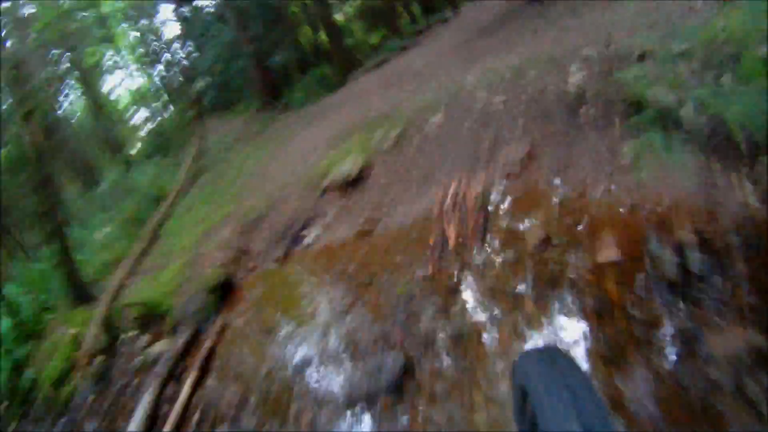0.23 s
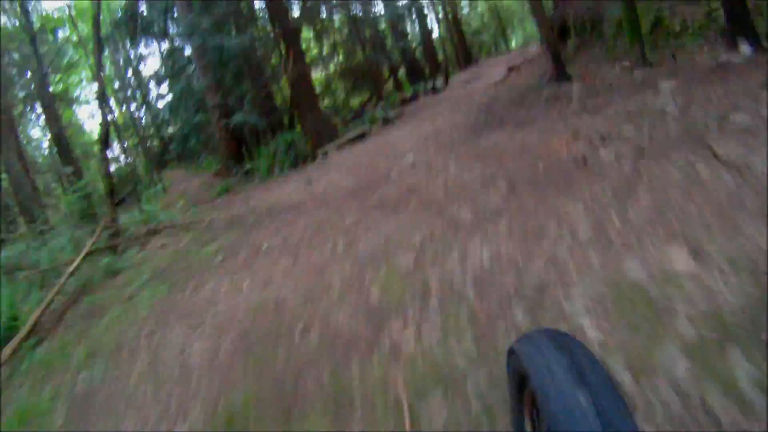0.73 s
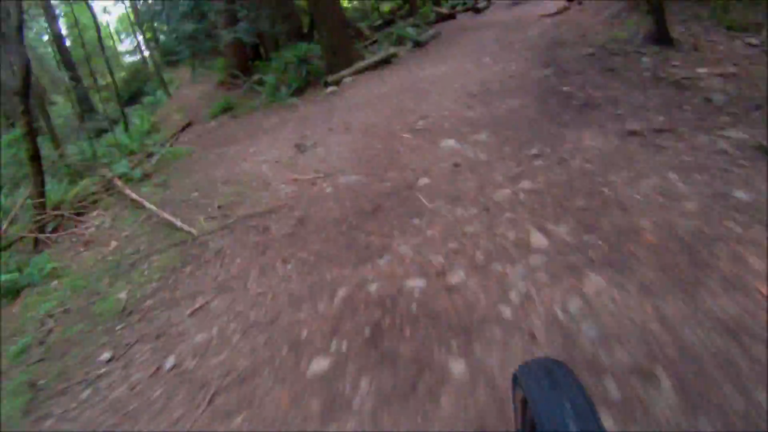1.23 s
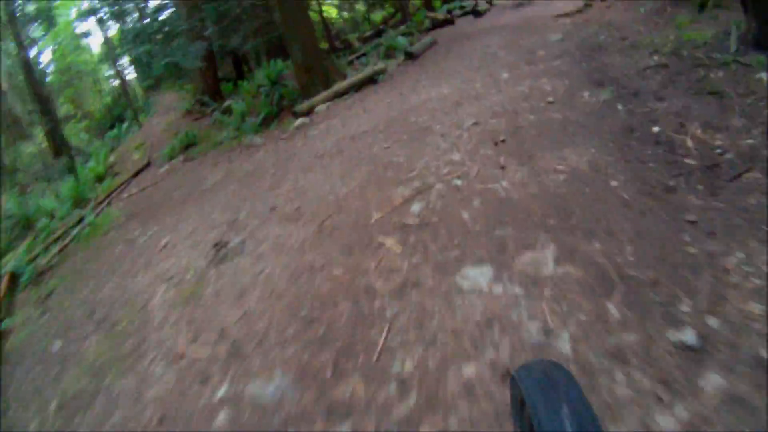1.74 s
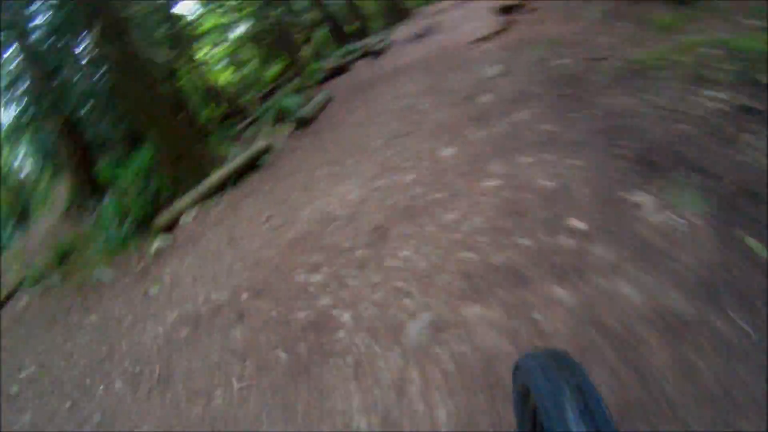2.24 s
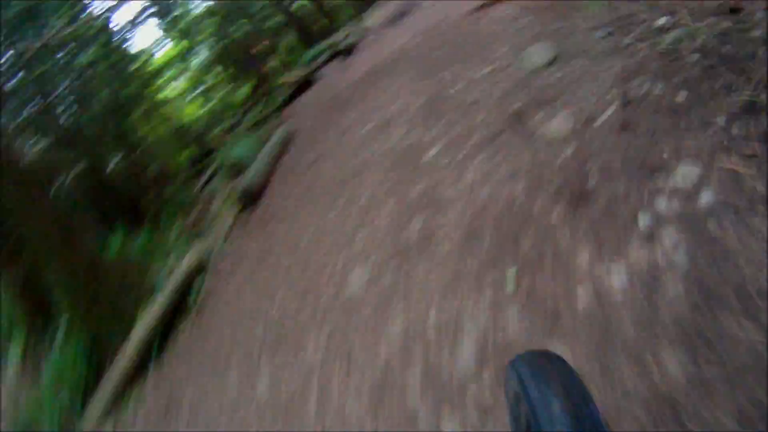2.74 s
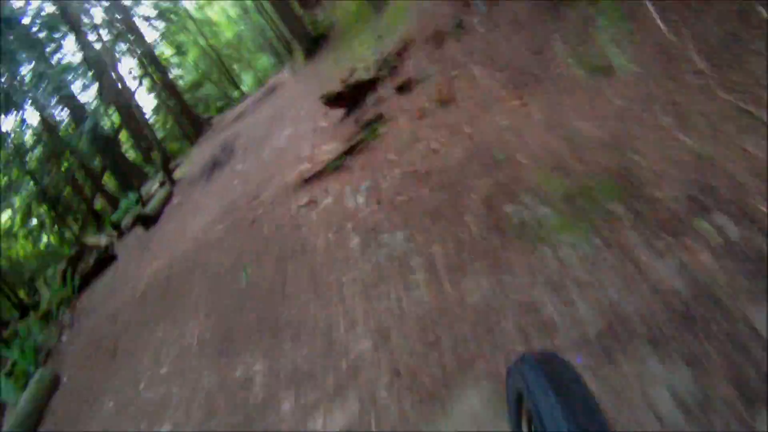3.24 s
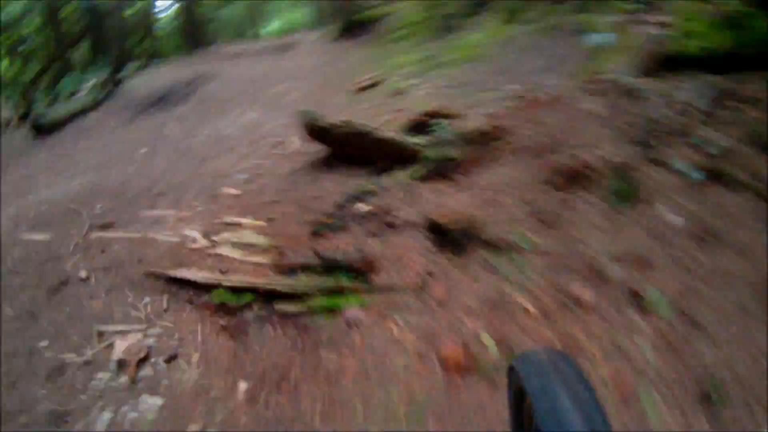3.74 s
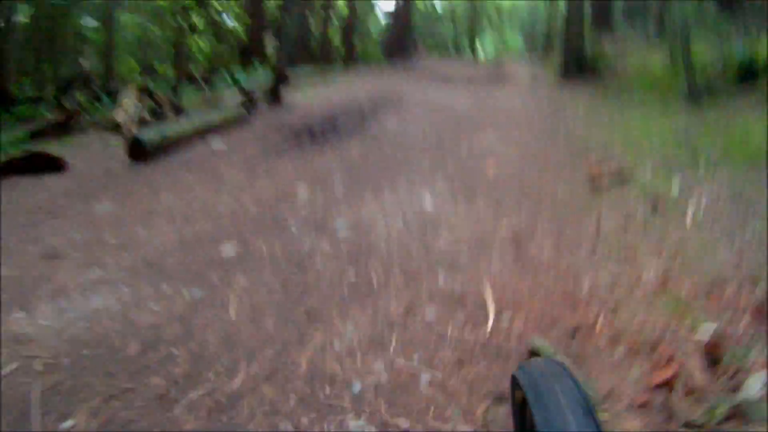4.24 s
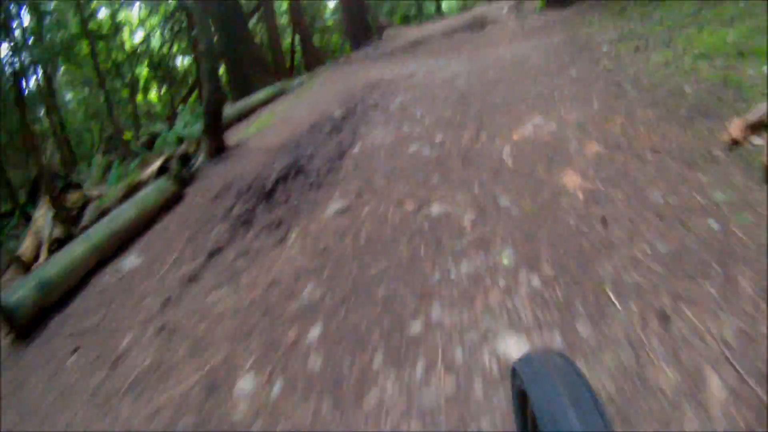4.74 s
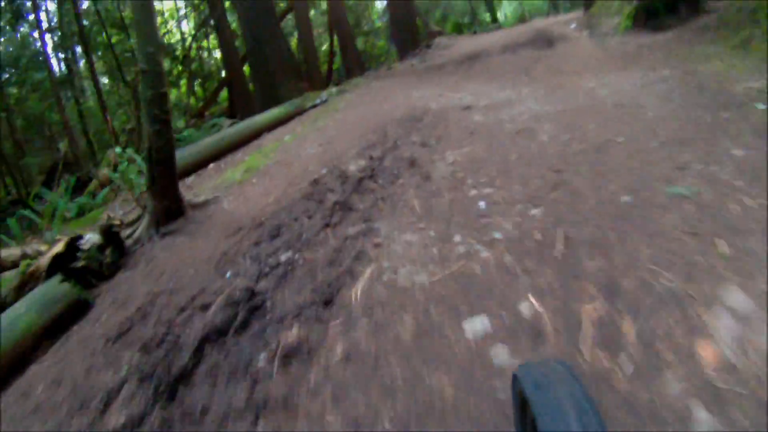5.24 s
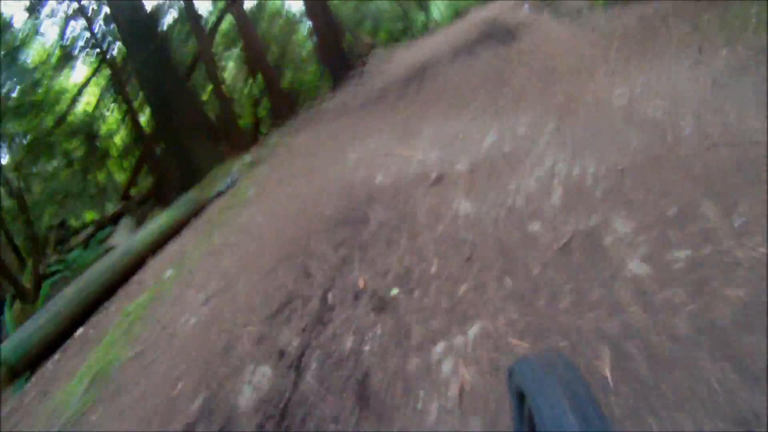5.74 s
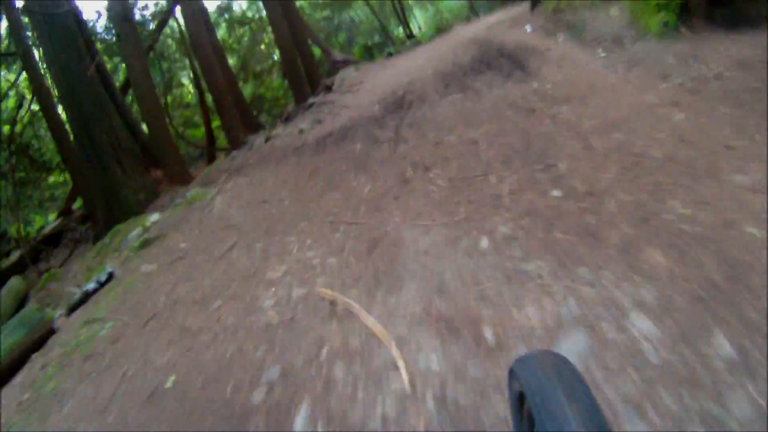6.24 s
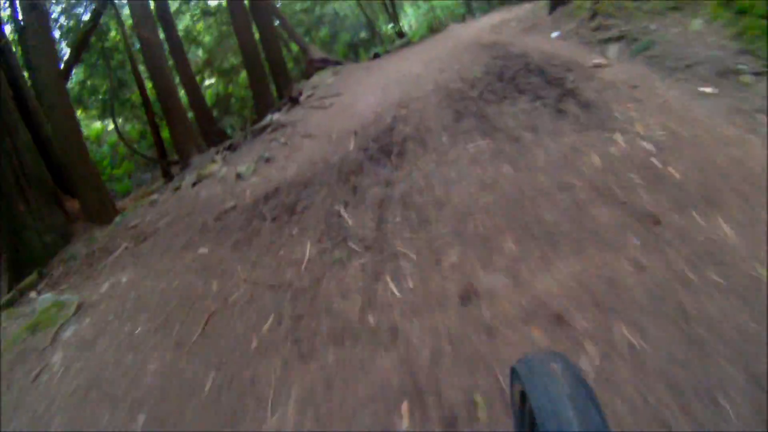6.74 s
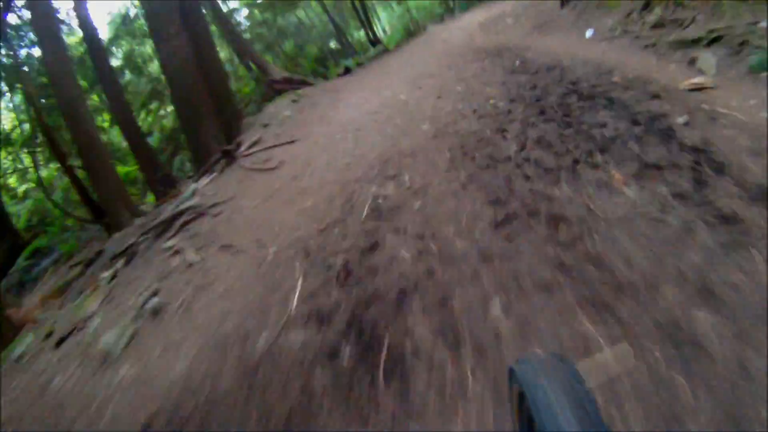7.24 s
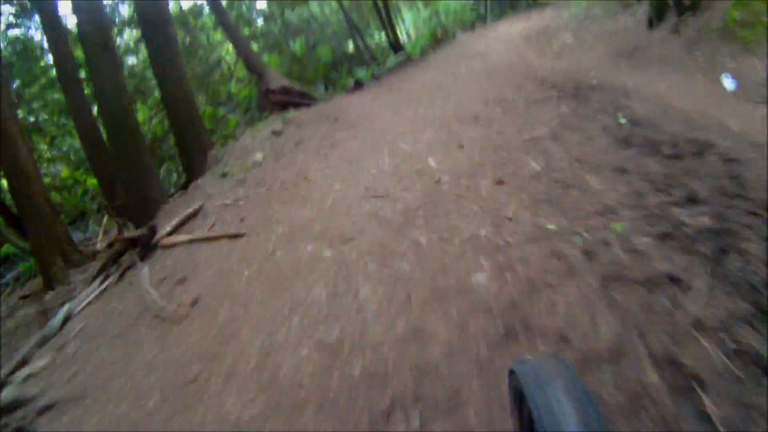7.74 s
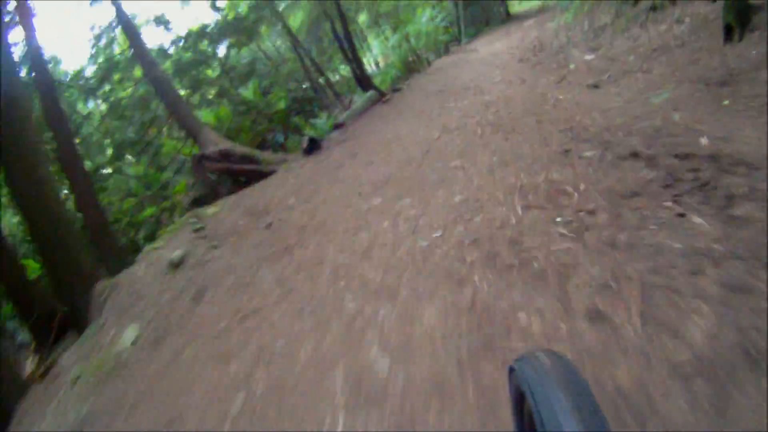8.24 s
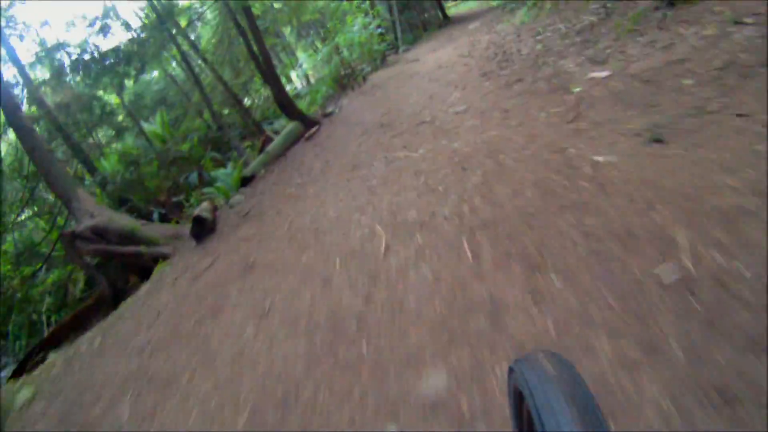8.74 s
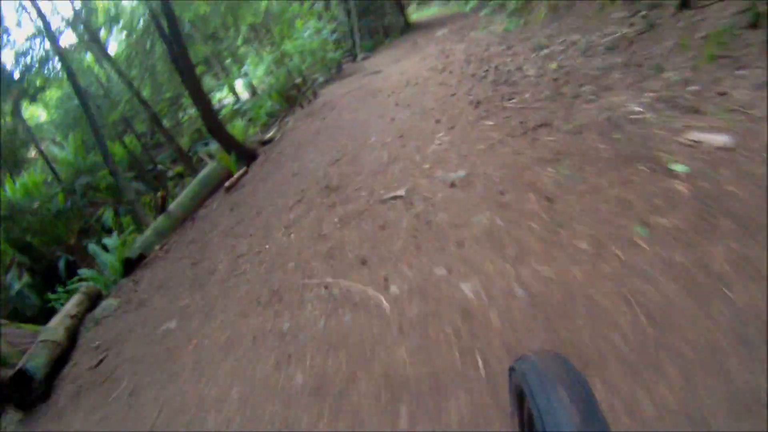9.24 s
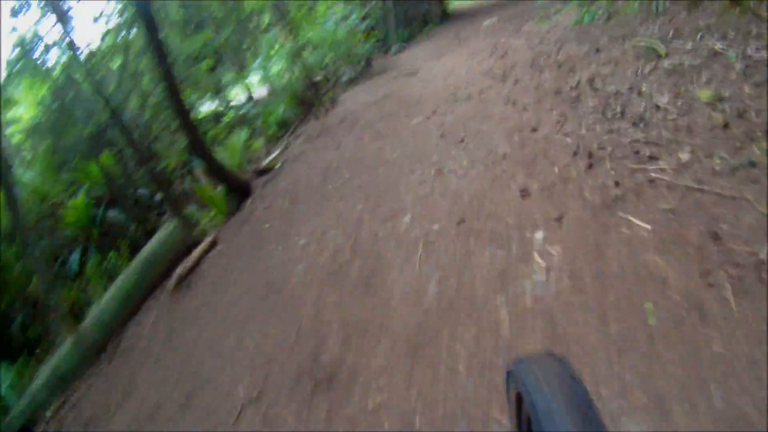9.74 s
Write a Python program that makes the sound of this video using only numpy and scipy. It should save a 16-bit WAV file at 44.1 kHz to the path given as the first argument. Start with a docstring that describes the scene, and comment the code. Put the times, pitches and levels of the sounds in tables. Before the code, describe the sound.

On a forest trail, a bicycle-mounted microphone in a boxy housing picks up water spraying off the tyre, then rough dirt grinding beneath it. Dense, hollow knocks and rattles dominate the first half, some distorting, with short brake-like squeaks and flung grit ticking on the frame. Toward the end the ground grows smoother, with quieter sandy rolling, occasional stone pops and a couple of last knocks.

```python
"""Water splashes and hard knocks ring out as a mountain bike runs fast down a forest trail, then dirt crunches.
Tyres: random pops, sand noise and grit through a boxy camera housing, over frame rumble and mount sway. Knocks
of chain and frame: short decaying sines with rattle, crack and thud; the hardest overload the input. Puddle:
dense filtered clicks. Also popping stones and a few knocks sounded alike, grit ticks, brake-like rubs, a faint
whine and hiss."""
import sys
import numpy as np
from scipy import signal
from scipy.fft import rfft, irfft
from scipy.io import wavfile
from scipy.ndimage import uniform_filter1d

SR = 44100
rng = np.random.default_rng(int(sys.argv[2]) if len(sys.argv) > 2 else 0)


def bounce(signal):
    """Save signal as a 16-bit WAV file at the path given by the first command-line argument."""
    frames = np.transpose(np.atleast_2d(signal))
    limited = np.clip(frames, -1, 1)
    pcm = np.round(limited * 32767).astype(np.int16)
    wavfile.write(sys.argv[1], SR, pcm)


N = 440118
TIME = np.arange(N) / SR

# Knocks of chain and frame. Each row: start [s], nominal peak [dB], ring pitch [Hz],
# nominal contact time [s], nominal crack level relative to the ring [dB].
KNOCK_EVENTS = [(0.0353, -3.5, 1880, 0.00089, -17), (0.1576, -7.5, 1624, 0.0032, -24),
                (0.2492, 1, 1370, 0.00009, -47), (0.3002, -5, 1550, 0.0019, -21),
                (0.5304, -5, 1480, 0.0018, -26), (0.7934, -5.5, 1920, 0.0022, -23),
                (0.8614, -4.5, 1510, 0.0039, -19), (0.8745, 0.5, 1900, 0.000048, -13.5),
                (0.9057, -1.5, 1700, 0.00064, -9.5), (0.9816, -5.5, 1840, 0.0017, -9.5),
                (1.018, -3, 1820, 0.00099, -42), (1.08, -8.5, 1570, 0.0017, -17),
                (1.2412, -14, 1480, 0.0027, -46), (1.406, -17.5, 1935, 0.0055, -14.5),
                (1.5274, -3, 1620, 0.00094, -11), (1.55, -9, 1580, 0.0062, -12),
                (1.5669, 0, 1330, 0.0021, -11), (1.595, -2.5, 1900, 0.0011, -9.5),
                (1.611, -1, 2060, 0.00044, -20), (1.6321, -3.5, 1930, 0.00056, -6.5),
                (1.6469, -3.5, 1445, 0.0035, -22.5), (1.795, -5.5, 1720, 0.0017, -13),
                (1.9199, -14.5, 1930, 0.0045, -28), (1.9721, 0.5, 1604, 0.00097, -37),
                (2.0616, -17, 1450, 0.00024, 1.5), (2.1337, -3, 1830, 0.00087, -7),
                (2.2514, -8.5, 1650, 0.0012, -16), (2.469, -13.5, 1720, 0.0024, -38),
                (2.5666, -4.5, 1580, 0.0029, -41), (2.6785, -5, 1620, 0.0009, -15.5),
                (2.797, -3.5, 1640, 0.0016, -20.5), (2.954, -12.5, 1680, 0.0015, -37),
                (3.124, -1.5, 1650, 0.0016, -31), (3.1812, -14.5, 1640, 0.0024, -48),
                (3.3829, -5, 1590, 0.0008, -38), (3.5229, -2.5, 1620, 0.00049, -36),
                (3.6098, -2, 1560, 0.0011, -29), (3.867, -3, 1386, 0.0042, -19.5),
                (3.9094, -6.5, 1700, 0.0054, -23), (3.944, -8, 1440, 0.0032, -47),
                (3.958, -1.5, 1890, 0.0012, -22.5), (4.1099, -4, 1570, 0.0019, -79),
                (4.1708, -4, 2080, 0.00052, -14), (4.4887, -8, 1550, 0.0018, -33),
                (4.52, -12, 1780, 0.001, -21), (4.6451, -2, 1300, 0.001, -14),
                (4.7323, -11, 1960, 0.003, -20.5), (4.7842, -0.5, 1480, 0.0041, -25.5),
                (4.833, -8, 1870, 0.0017, -18.5), (4.96, -9, 1630, 0.0018, -22),
                (4.976, -7.5, 2040, 0.0041, -32), (5.1093, -2.5, 1520, 0.00045, -27.5),
                (5.2234, -6.5, 1720, 0.0015, -49), (5.2939, -4, 1440, 0.0036, -17.5),
                (5.58, -13.5, 1950, 0.00081, -21), (5.707, -7, 1490, 0.000061, -25),
                (5.8827, -7, 1510, 0.001, -50), (6.337, -13, 1490, 0.0021, -42),
                (6.57, -10, 1630, 0.00013, -19), (6.735, -8.5, 1570, 0.00093, -46),
                (6.7872, -7.5, 1510, 0.0013, -56), (6.8951, -5.5, 1450, 0.00044, -14),
                (6.9573, -10.5, 1640, 0.00021, -19.5), (7.327, -12, 1500, 0.00043, -20.5),
                (7.357, -13.5, 1470.0, 0.0012, -49), (7.649, -9, 1550, 0.0017, -22),
                (7.7246, -5.5, 1620, 0.00026, -9.5), (7.817, -7.5, 1270, 0.00059, -21),
                (8.0657, -8.5, 1470, 0.00086, -49), (8.1082, -9.5, 1530, 0.0033, -44),
                (9.402, -10.5, 1350, 0.00055, -20.5), (9.953, -7.5, 1640, 0.0017, -24),
                (9.9707, -6.5, 1510, 0.00039, -17)]
# Colour of the frame's rumble. Each row: frequency [Hz], gain [dB].
FRAME_COLOUR = [(20, -28), (45, -17), (64, -10), (115, -12), (165, 1), (220, 5.5), (280, -1.5), (350, -6),
                (440, -18), (700, -15), (1500, -71.5)]
# What the housing passes on from a small impact. Each row: frequency [Hz], gain [dB].
HOUSING_COLOUR = [(150, -21), (560, -17.5), (740, -2), (1120, -5), (1420, 2.5), (1630, 5), (1800, -5.5),
                  (2020, -1), (2250, -8), (2550, -9.5), (2950, -28), (3400, -34.5), (5000, -36.5),
                  (14000, -72)]
# Colour of flying grit and water. Each row: frequency [Hz], gain [dB].
SPRAY_COLOUR = [(1200, -2.5), (2800, -4), (4300, 1.5), (5500, -2.5), (7000, -11), (10500, -29.5),
                (15500, -39)]

# Unweighted, the frame calms quickly; the tread leaves the gravel gradually. dB per unit of hop height.
LIFT_RUMBLE_DB, LIFT_RUMBLE_S = -9, 0.036
LIFT_CRUNCH_DB, LIFT_CRUNCH_S = -23.5, 0.26


def gain_of(db):
    """Amplitude factor of a level in dB."""
    return 10 ** (np.asarray(db) / 20)


def evened(x):
    """Scale to unit RMS."""
    return x / np.sqrt(np.mean(x ** 2) + 1e-20)


def local_power(x, size):
    """Mean power over about size samples."""
    smoothed = uniform_filter1d(uniform_filter1d(x ** 2, size), size // 2)
    return abs(smoothed) + 1e-12


def steadied(x, size):
    """Near-unit power over every stretch of about size samples; finer grain stays."""
    return x / np.sqrt(local_power(x, size))


def add(mix, s, sound):
    """Add a sound to the mix in place, starting at s seconds."""
    part = mix[max(round(s * SR), 0):][:len(sound)]
    part += sound[:len(part)]


def coloured(x, points, size=8192):
    """Causal minimum-phase filter with the given spectrum: clicks ring after they land."""
    hz, db = np.transpose(points)
    bin_hz = abs(np.fft.fftfreq(size, 1 / SR))
    log_gain = np.log(gain_of(np.interp(np.log(bin_hz + 1), np.log(hz), db)))
    spectrum = np.exp(np.conj(signal.hilbert(log_gain)))
    response = np.fft.ifft(spectrum).real[:size // 2]
    return signal.oaconvolve(x, response)[:len(x)]


def band(x, hz, width_hz):
    """A resonance of gain one at its centre."""
    return signal.lfilter(*signal.iirpeak(hz, hz / width_hz, SR), x)


def wander(hz):
    """Slow random motion of unit RMS: noise under a Gaussian low-pass."""
    low_pass = np.exp(-(np.fft.rfftfreq(N, 1 / SR) / hz) ** 2)
    return evened(irfft(rfft(rng.standard_normal(N)) * low_pass, N))


def impacts(per_s, spread_db):
    """Random clicks of either sign, many small and a few large."""
    size = gain_of(spread_db * np.minimum(rng.exponential(1, N), 5))
    return size * rng.choice([-1, 1], N) * (rng.random(N) < per_s / SR)


def hiss(db=-73.5):
    """Steady white noise floor."""
    return gain_of(db) * rng.standard_normal(N)


def camera_whine(hz=7868, db=-71, frames_per_s=30):
    """A faint electronic tone that switches on once per picture frame."""
    switched = np.sin(2 * np.pi * frames_per_s * TIME) > -.25
    return gain_of(db) * switched * np.sin(2 * np.pi * hz * TIME)


def rubs():
    """Brief friction, probably a brake pad on its disc: a fuzzy whistle that sinks and judders."""
    # Each row: start [s], length [s], mid pitch [Hz], RMS level before the fades [dB].
    rub_events = [(1.061, 0.1, 4160, -41.5), (1.677, 0.073, 4200, -43.5), (2.291, 0.078, 4500, -45.5),
                  (2.563, 0.083, 4170, -42), (4.25, 0.13, 4240, -46)]
    sag_hz_per_s, fuzz_cutoff_hz, judder_hz = 2200, 210, 26
    out = np.zeros(N)
    for s, length_s, hz, db in rub_events:
        t = np.arange(round(length_s * SR)) / SR
        turns = np.cumsum(hz - sag_hz_per_s * (t - length_s / 2)) / SR
        low_pass = signal.butter(2, fuzz_cutoff_hz, fs=SR)
        fuzz = signal.lfilter(*low_pass, rng.standard_normal((2, SR)))[:, :len(t)]
        whistle = fuzz[0] * np.cos(2 * np.pi * turns) + fuzz[1] * np.sin(2 * np.pi * turns)
        grip = 1 + 0.59 * np.sin(2 * np.pi * (judder_hz * t + rng.random()))  # the pad catches and slips
        add(out, s, gain_of(db) * signal.windows.tukey(len(t), .5) * evened(grip * whistle))
    return out


def ticks():
    """Flung grit strikes the frame at various spots: noise bursts, each with its own bright ring."""
    # Each row: start [s], peak [dB].
    tick_events = [(1.328, -28), (2.705, -29), (3.625, -21), (3.651, -20), (3.738, -22), (4.702, -18),
                   (4.899, -21), (5.191, -25), (5.781, -22.5), (5.929, -24.5), (6.029, -27.5),
                   (6.121, -31.5), (7.163, -26.5), (7.766, -31), (8.031, -22), (8.208, -30.5),
                   (8.258, -29.5), (8.361, -30), (8.638, -30.5), (8.791, -29.5)]
    base_hz, decay_s = 4930, 0.00089
    out, t = np.zeros(N), np.arange(2048) / SR
    for s, db in tick_events:
        strike = rng.standard_normal(len(t)) * np.exp(-t / decay_s)
        bright = coloured(strike, SPRAY_COLOUR)
        ring = band(bright, base_hz * 2 ** rng.uniform(-0.75, 0.6), 500)
        tick = evened(bright) + .6 * evened(ring)
        add(out, s, gain_of(db) * tick / abs(tick).max())
    return out


def pops():
    """Larger stones pop from under the tread, and a few further knocks sound the same way: a swelling, dying
    ring in the housing plus a scrape of sand."""
    # Each row: start [s], peak [dB]. The rows at 3.045, 3.63, 3.889 and 8.078 s are further knocks.
    pop_events = [(1.116, -9), (3.045, -9), (3.63, -13), (3.889, -17), (4.865, -10), (4.912, -15.5),
                  (5.074, -9), (5.145, -6.5), (5.25, -11.5), (5.646, -13), (5.927, -12), (5.992, -11.5),
                  (6.253, -21), (6.8, -19), (7.414, -16), (8.078, -12), (8.385, -14), (8.497, -20.5),
                  (8.546, -14.5), (8.592, -21), (8.642, -13.5), (8.718, -19), (8.788, -13.5)]
    base_hz, swell_s = 1620, 0.0016
    out, t = np.zeros(N), np.arange(2048) / SR
    swell = t * np.exp(-t / swell_s)
    for s, db in pop_events:
        hz = base_hz * np.exp(0.083 * rng.standard_normal())
        ring = swell * np.sin(2 * np.pi * hz * t)
        scrape = coloured(swell * rng.standard_normal(len(t)), HOUSING_COLOUR)
        pop = evened(ring) + 0.74 * evened(scrape)
        add(out, s, gain_of(db) * pop / abs(pop).max())
    return out


def splash():
    """Puddle and wet tyre shedding it: countless droplets hiss, with larger spatters among them."""
    # Each row: time [s], hiss level [dB].
    puddle_levels = [(0, -47), (.15, -41.5), (.45, -36.5), (.7, -41), (1, -35.5), (1.25, -69), (1.4, -95.5)]
    clumped = impacts(per_s=5000, spread_db=3.6) * gain_of(2.4 * wander(hz=40))
    drops = coloured(clumped, SPRAY_COLOUR)
    return gain_of(np.interp(TIME, *np.transpose(puddle_levels))) * evened(drops)


def bump(start_s, length_s, rise_s=0.024, decay_s=0.019):
    """The push of one bump on the tyre: it presses in, holds while the patch lasts, springs back."""
    age = TIME - start_s
    press = np.clip(age / rise_s + .5, 0, 1)
    return press * np.exp(-np.clip((age - length_s) / decay_s, 0, 20))


def lift(settle_s):
    """How far the weight is off the wheels in a hop; it is back at once on landing."""
    # Each row: going light [s], touch-down [s], relative height.
    hop_events = [(1.23, 1.489, 1.25), (1.87, 1.972, .9), (4.23, 4.488, .85)]
    total = 0
    for light, down, height in hop_events:
        rise = 1 - np.exp(-np.maximum(TIME - light, 0) / settle_s)
        total = total + height * (TIME < down) * rise
    return total


def jolts(decay_s=0.01):
    """Power of the shaking that dies away after each knock."""
    blows = np.zeros(N)
    for s, peak_db, *_ in KNOCK_EVENTS:
        add(blows, s, gain_of([peak_db]) ** 2)
    return signal.lfilter([1], [1, -np.exp(-2 / (decay_s * SR))], blows + 1e-20)


def ride():
    """Drive of frame rumble and gravel crunch: rolling plus bumps, eased by hops, plus jolts, as powers."""
    # Steady rolling on changing ground. Each row: time [s], rumble drive [dB], crunch drive [dB].
    rolling = [(0.0, -31, -23.5), (0.65, -32.5, -21), (1.15, -35, -20), (1.8, -36, -22), (2.4, -38, -27.5),
               (2.9, -35.0, -30), (3.23, -37.5, -33.5), (3.5, -30.5, -24), (4.2, -39, -21), (4.8, -41, -28),
               (5.3, -32.5, -26), (5.53, -39, -37.5), (5.7, -35.5, -29), (6.2, -36, -28),
               (6.48, -39.5, -35), (8.6, -38.5, -32.5), (9.55, -44.5, -42.5), (9.98, -38.5, -33)]
    # Roots and stony patches. Each row: start [s], length [s], rumble drive [dB], crunch drive [dB].
    patches = [(0.114, 0.015, -22.5, -21), (0.197, 0.12, -30, -22), (0.368, 0.14, -27, -24.5),
               (0.713, 0.046, -24, -26), (0.85, 0.18, -23.5, -20.5), (1.061, 0.044, -26, -14.5),
               (1.496, 0.12, -24, -11.5), (1.641, 0.081, -29.5, -15), (2.114, 0.095, -30.5, -23.5),
               (2.251, 0.079, -33.5, -22.5), (2.481, 0.092, -31.5, -22), (2.634, 0.05, -27, -21),
               (2.738, 0.06, -29, -20), (2.958, 0.11, -32, -24.5), (3.086, 0.086, -29.5, -24),
               (3.308, 0.093, -30, -22.5), (3.573, 0.09, -36, -19), (3.804, 0.17, -30.0, -21.5),
               (4.155, 0.04, -24.5, -18.5), (4.499, 0.044, -27, -19.5), (4.679, 0.022, -21.5, -18.5),
               (4.743, 0.17, -34, -20.5), (4.992, 0.029, -20.5, -16.5), (5.092, 0.063, -22.5, -19.5),
               (5.612, 0.1, -38, -23.5), (5.862, 0.133, -30, -25), (6.294, 0.075, -35.5, -30),
               (6.695, 0.11, -31, -25), (7.302, 0.075, -33.5, -28.5), (7.732, 0.031, -35, -26),
               (7.999, 0.12, -31, -24), (8.207, 0.061, -35.5, -27.5), (8.346, 0.053, -33.5, -27),
               (8.621, 0.023, -35, -27.5), (9.939, 0.02, -28, -28.5)]
    jolt_rumble_db, jolt_crunch_db = -35.5, -16.5  # relative to the knock's nominal peak
    s, rumble_db, crunch_db = np.transpose(rolling)
    ripple_db = 2.07 * wander(hz=36)  # small ripples in the trail
    jolt = jolts()
    shake = gain_of(np.interp(TIME, s, rumble_db) + ripple_db) ** 2
    load = gain_of(np.interp(TIME, s, crunch_db) + ripple_db) ** 2
    for start_s, length_s, thump_db, grind_db in patches:
        push = bump(start_s, length_s) ** 2
        shake = shake + push * gain_of(thump_db) ** 2
        load = load + push * gain_of(grind_db) ** 2
    shake = shake * gain_of(LIFT_RUMBLE_DB * lift(LIFT_RUMBLE_S)) ** 2
    load = load * gain_of(LIFT_CRUNCH_DB * lift(LIFT_CRUNCH_S)) ** 2
    shake = shake + jolt * gain_of(jolt_rumble_db) ** 2
    load = load + jolt * gain_of(jolt_crunch_db) ** 2
    return np.sqrt(shake), np.sqrt(load)


def pebbles(stones, count=16):
    """Each stone swells and dies within a few cycles, at one of count pitches, with short or long damping."""
    kind, t = rng.integers(0, count, N), np.arange(600) / SR
    pitches_hz = np.geomspace(900, 2500, count)
    decays_s = np.resize([.00035, .0009], count)
    total = np.zeros(N)
    for k, (hz, decay_s) in enumerate(zip(pitches_hz, decays_s)):
        ring = evened(t * np.exp(-t / decay_s) * np.sin(2 * np.pi * hz * t))
        total += signal.oaconvolve(stones * (kind == k), ring)[:N]
    return evened(total)


def tyres():
    """Stones pop under the tread in clumps, grind in the housing and throw up grit; frame and mount shake."""
    shake, load = ride()
    ground = 0.64 * wander(hz=63.0) + 1.18 * wander(hz=12.5)  # ruts and gravel patches, shared by layers
    stones = evened(impacts(per_s=330, spread_db=2.5) * gain_of(5.3 * ground))
    stones = evened(np.tanh(stones / 50))  # the soft tread cushions the biggest pops
    # a grind of sand fills in between the pops, its share almost independent of load
    sand = 1.65 * load ** 0.036 * rng.standard_normal(N) * gain_of(3.75 * ground)
    drive = pebbles(stones) + sand
    # hard going sets the housing buzzing at two pitches
    buzz = band(drive, 1425, 110) + 1.36 * band(drive, 1878, 110)
    crunch = coloured(drive + 17 * load * buzz, HOUSING_COLOUR)
    bite = load / np.sqrt(local_power(crunch, size=2000))
    # a stone scatters a short puff of grit, weak or strong by chance, over a steadier fizz
    snaps = (stones * gain_of(8.2 * rng.standard_normal(N))) ** 2
    puffs = np.sqrt(signal.lfilter([1], [1, -np.exp(-1 / (0.0017 * SR))], snaps))
    fizz = gain_of(-25.0) * load ** 1.374 * gain_of(3.5 * wander(hz=45))
    grains = evened(coloured(impacts(per_s=4500, spread_db=3.5), SPRAY_COLOUR))
    grit = (fizz + gain_of(-26.5) * bite * evened(puffs)) * grains
    rumble = coloured(rng.standard_normal(N) * gain_of(2.93 * ground), FRAME_COLOUR)
    # the camera mount sways at a low resonance with the shaking and eases in a hop
    sway = band(band(rng.standard_normal(N), 45, 38), 45, 38)
    sway_gain = gain_of(-33 - 10 * lift(LIFT_RUMBLE_S)) * shake ** 0.38
    frame = gain_of(-2.0) * shake * steadied(rumble, size=2600)
    gravel = gain_of(-3.03) * bite * crunch
    return frame + gravel + grit + sway_gain * steadied(sway, size=6000)


def knock(peak_db, hz, contact_s, crack_db):
    """The housing rings while the contact lasts and dies in a few cycles; loose parts chatter after it."""
    # Colour of a hard contact. Each row: frequency [Hz], gain [dB].
    crack_colour = [(300, 1), (900, -23), (2450, 17), (3300, 5), (4300, 7), (5400, 5.5), (8000, -6),
                    (15000, -48.5)]
    t = np.arange(4096) / SR
    chatter, grit, shove = rng.standard_normal((3, len(t)))
    rise = 1 - np.exp(-t / (.0001 + .22 * abs(contact_s)))
    swing = rise * np.exp(-np.maximum(t - 1.825 * contact_s, 0) / 0.00096)
    ring = swing / swing.max() * np.sin(2 * np.pi * hz * t)
    # a hard contact also wakes a higher mode of the housing
    upper_hz = 2450 * np.exp(0.058 * rng.standard_normal())
    upper = evened(swing * np.sin(2 * np.pi * upper_hz * t))
    rattle = coloured(chatter * rise * np.exp(-t / 0.0069), HOUSING_COLOUR)
    crack_decay_s = 0.00024 + 0.92 * abs(contact_s)
    crack = coloured(grit * rise ** 2 * np.exp(-t / crack_decay_s), crack_colour)
    # the heaviest blows overload the input: a burst of bright distortion, made here from noise
    overload = gain_of(3.2 * peak_db - 4) * evened(band(grit * np.exp(-t / .001), 7000, 8000))
    thud = coloured(shove * np.exp(-t / 0.0063), FRAME_COLOUR)
    parts = gain_of(-7.0) * evened(rattle) + gain_of(-22.0) * evened(thud)
    parts += gain_of(crack_db + 3) * (evened(crack) + overload)
    parts += gain_of(crack_db / 2 - 7.5) * upper
    return gain_of(peak_db - 0.68) * (ring + ring.std() * parts)


def knocks():
    """Every bump that slaps the chain or frame."""
    out = np.zeros(N)
    for s, *blow in KNOCK_EVENTS:
        add(out, s, knock(*blow))
    return out


def scene():
    """Sum of all layers, as one channel."""
    background = hiss() + camera_whine() + rubs()
    trail = ticks() + pops() + splash() + tyres()
    return (background + trail + knocks())[None]


def record(dry):
    """The hardest knocks overload the input and clip; then a linear-phase low-pass limits the band."""
    edge_hz = 16000
    clipped = np.clip(dry, -.97, .97)
    low_pass = signal.firwin(511, edge_hz, window=("kaiser", 9), fs=SR)
    return signal.oaconvolve(clipped, low_pass[None], "same")


dry = scene()
out = record(dry)
bounce(out)
```